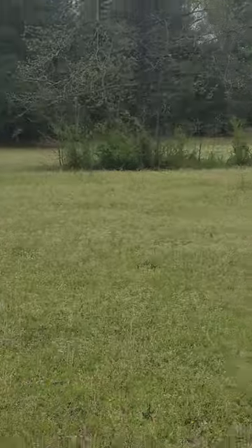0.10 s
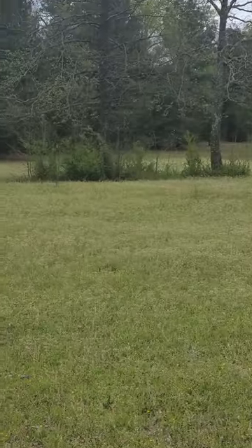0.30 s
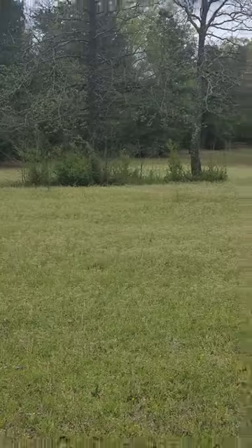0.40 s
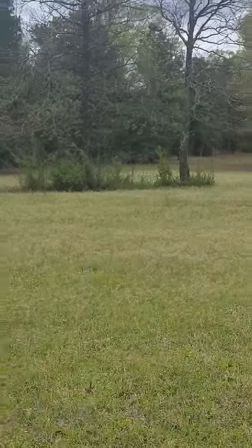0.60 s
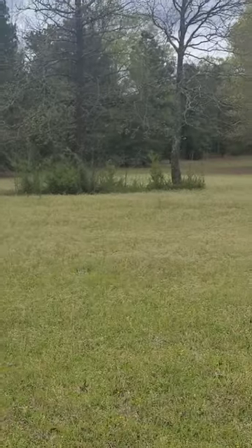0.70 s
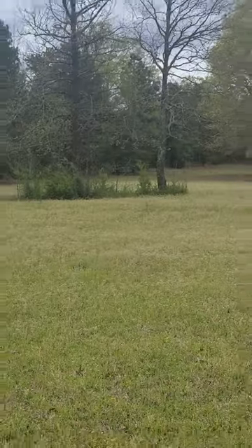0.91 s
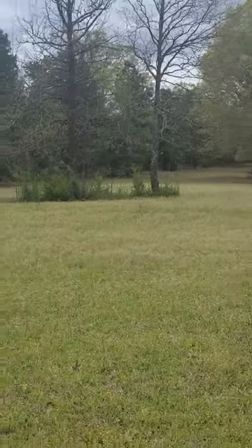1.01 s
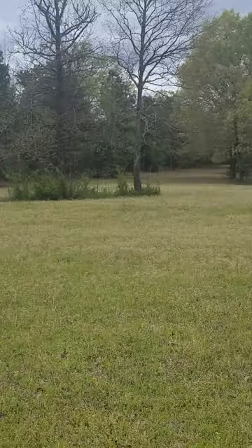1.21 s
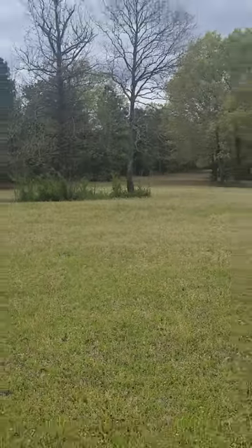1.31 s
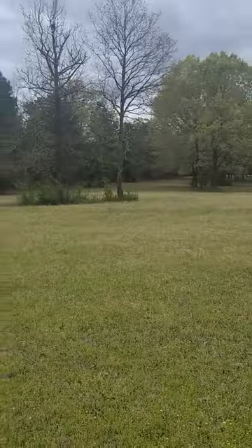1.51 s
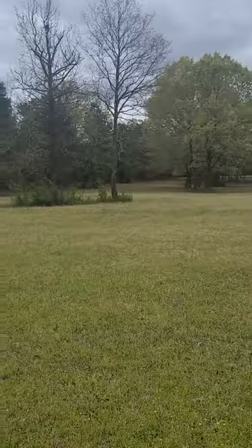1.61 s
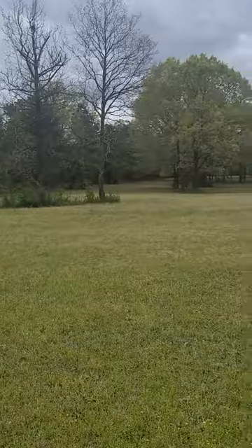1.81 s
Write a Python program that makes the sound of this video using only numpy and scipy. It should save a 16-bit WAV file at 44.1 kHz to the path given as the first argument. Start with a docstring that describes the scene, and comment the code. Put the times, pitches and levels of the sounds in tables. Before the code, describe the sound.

Wind thumps and rumbles on a handheld camera's microphone, strongest near the start, then easing; in a quiet open field a faint cricket trills on the right and a far bird whistles brief gliding notes.

```python
"""Wind buffets in gusts over a soft far hiss and a low drone, while a cricket trills on the right.
A far bird whistles two groups of brief gliding notes, then a thin call drops and flutters; a short rustle
and small ticks sound close by. Wind, hiss, drone and rustle are coloured noise of set left-right likeness;
cricket and birds are gliding sines with scattered echoes; ticks are impulses ringing the shell of
a hand-held camera, whose two ports the wind presses on. Far wind, hiss and cricket sink slowly."""
import sys
import numpy as np
from scipy import signal
from scipy.fft import rfft, irfft, next_fast_len
from scipy.io import wavfile
from scipy.ndimage import map_coordinates

SR = 44100
rng = np.random.default_rng(int(sys.argv[2]) if len(sys.argv) > 2 else 0)


def to_wav(s):
    """Save 16-bit WAV."""
    ch = np.atleast_2d(s).T  # columns
    pcm = np.round(np.clip(ch, -1, 1) * 32767)  # PCM
    wavfile.write(sys.argv[1], SR, pcm.astype(np.int16))


N = 83790
T = np.arange(N) / SR


def amp(db):
    """Decibel law: 20 dB is a factor of ten in amplitude."""
    return 10 ** (np.asarray(db) / 20)


def unit(x):
    """Power normalization: x scaled to rms 1."""
    return x / np.sqrt(np.mean(x ** 2) + 1e-20)


def curves(rows, at=T):
    """Linear interpolation of each column against the first, read along at."""
    s, *cols = np.transpose(rows)
    return [np.interp(at, s, c) for c in cols]


def along(points, hz):
    """Interpolation of (Hz, value) points on a logarithmic frequency axis."""
    f, v = np.transpose(points)
    return np.interp(np.log(hz + 1), np.log(f + 1), v)


def wobble(rate):
    """Slow random modulation: a smooth curve through random knots, rate of them a second."""
    return map_coordinates(rng.standard_normal(400), [T * rate])


def filtered(x, response):
    """Linear filtering: the spectrum of x times a response of frequency."""
    m = next_fast_len(N + SR // 2)
    return irfft(rfft(x, m) * response(np.fft.rfftfreq(m, 1 / SR)), m)[..., :N]


def panned(x, pan_db, lag_s=0):
    """Interaural differences: left is pan_db above right and lag_s after it; the gains average one."""
    if lag_s:
        x = filtered(x, lambda hz: np.exp(np.outer([-1j, 1j], np.pi * hz * lag_s)))
    left = amp(pan_db) / (1 + amp(pan_db))
    return 2 * x * np.array([left + 0 * T, 1 - left + 0 * T])


def rush(gain, alike):
    """Partial coherence: stereo noise of rms 1 from mid and side, with a colour and a likeness."""
    def turn(hz):
        return np.arccos(np.clip(alike(hz), -1, 1)) / 2

    def mid_side_gain(hz):
        return gain(hz) * [np.cos(turn(hz)), np.sin(turn(hz))]

    mid, side = filtered(rng.standard_normal((2, N)), mid_side_gain)
    return unit(np.array([mid + side, mid - side]))


def shape(points):
    """Spectral envelope: the gain of a spectrum table, silent outside it."""
    return lambda hz: amp(along(points, hz)) * (hz > points[0][0]) * (hz < points[-1][0])


def hum_band(centre_hz, width_hz):
    """Band-pass selectivity: a single steep-sided band."""
    return lambda hz: 1 / (1 + ((hz - centre_hz) / width_hz * 2) ** 4)


def echo(x, t60):
    """Diffuse scattering: decaying noise answers x, different in each channel."""
    tail = rng.standard_normal((2, SR // 2)) * amp(-60 * T[:SR // 2] / t60)
    return signal.fftconvolve(x[None], tail / np.linalg.norm(tail[0]), axes=1)[:, :N]


def gate(start, length, edge):
    """Amplitude envelope: linear rise, hold and linear fall within length."""
    return np.clip(np.minimum(T - start, start + length - T) / edge, 0, 1)


def swell(start, rise, hold, fall_db_per_s):
    """Exponential decay: linear rise, hold, then a fade at a constant dB rate."""
    return np.clip((T - start) / rise, 0, 1) * amp(-fall_db_per_s * np.clip(T - start - rise - hold, 0, None))


def peak(f, hz, width):
    """Damped resonance: the response of one band-pass mode."""
    return 1j * f * width / (hz * hz - f * f + 1j * f * width)


def buffet():
    """Turbulent pressure: eddies press on each port; the port facing the gust is louder."""
    # Gusts: start_s, level_db, left_minus_right_db, brightness_db
    gusts = [(0.0, -46.5, 28, -4.5), (0.078, -45.5, 3.5, 6.5), (0.196, -46.5, -5, 11),
             (0.214, -40.5, -16, -14), (0.264, -34, 14, -27), (0.284, -27.5, 5, -6), (0.328, -32.5, 3, -24),
             (0.372, -47, 11, 7), (0.396, -27, -0.5, -2), (0.44, -20.5, -14.5, -4.5),
             (0.46, -31, -12, 12.5), (0.49, -26, 2.5, -19), (0.53, -20.5, -0.5, -8.5), (0.57, -34.5, 6, -5),
             (0.612, -33, 21, -3.5), (0.652, -47.5, 0.5, 6.5), (0.968, -51, 3, 7.5), (1.036, -44.5, 7, -4),
             (1.364, -42.5, 14.5, -0.5), (1.402, -47.5, 7, 3), (1.454, -46.5, 11, 18.5),
             (1.57, -35, 4.5, -25), (1.608, -50, -1, 4), (1.746, -42.5, 11, -5), (1.778, -43, 8.5, 12.5),
             (1.83, -60, 3, -3), (1.878, -43.5, 6, 5), (1.9, -63, 10, -26)]
    # Deep body of a gust: frequency_hz, relative_density_db
    rumble = [(12, -34.5), (20, -5), (40, 2.5), (62, 0), (118, -15), (139, -18), (176, -25.5), (325, -49.5),
              (450, -59), (580, -81), (990, -120)]
    # Bright edge of a gust: frequency_hz, relative_density_db
    flutter = [(59, -36.5), (100, 4), (140, -4), (248, -34), (600, -61.5), (780, -83), (1320, -120)]
    flutter_db, lump_db, ports_alike = -12, 1, 0.66
    level_db, pan_db, bright_db = curves(gusts)

    def alike(hz):
        return ports_alike + 0 * hz

    body = rush(shape(rumble), alike)
    edge = amp(flutter_db + bright_db) * rush(shape(flutter), alike)
    # each port has its own unevenness
    lumps_db = lump_db * np.array([wobble(14.16), wobble(18)])
    return panned(amp(level_db + lumps_db) * (body + edge), pan_db)


def field():
    """Diffuse field: wind in far trees, treble hiss and low humming bands, each filtered noise."""
    # Far levels before the offsets below: start_s, trees_db, hiss_db
    far_levels = [(0.0, -69.5, -75), (0.338, -68.5, -75), (0.57, -69, -76), (0.772, -71, -77.5),
                  (1.386, -75.5, -82.5), (1.9, -74.5, -81)]
    # Colour of wind in trees: frequency_hz, relative_density_db
    tree_colour = [(150, -20), (250, -2.5), (316, -1), (460, -7), (528, -5), (613, -4.5), (698, -4),
                   (2000, -23), (2600, -83), (4400, -120)]
    # Colour of the treble hiss: frequency_hz, relative_density_db
    hiss_colour = [(1500, -20.5), (2200, 0.5), (4200, -2.5), (4800, -4), (6300, -5.5), (6900, -13),
                   (7600, -9.5), (8400, -24), (10300, -23.5), (11200, -19), (11700, -11.5), (15700, -18)]
    # Coherence of the channels: frequency_hz, likeness (1 = identical)
    coherence = [(300, 0.78), (1500, 0.082), (5000, 0.043), (12000, 0.026)]
    # Balance of trees and hiss: frequency_hz, left_minus_right_db
    balance = [(330, -5), (650, 2.5), (1300, -6), (2500, -5.5), (6000, 2), (13000, -6)]
    # Drone bands: centre_hz, width_hz, mean_level_db (before the wander below)
    drone_bands = [(124.5, 37.6, -53), (176.3, 77, -63.5)]
    # A narrower hum that comes and goes: start_s, level_db
    hum_levels = [(0.0, -74), (0.476, -65.5), (0.84, -64), (0.856, -61), (1.412, -82), (1.798, -75.5),
                  (1.9, -75)]
    trees_offset_db, hiss_offset_db = 2, 1.5
    drone_alike, drone_pan_db = 0.9, -3.5
    hum_hz, hum_width_hz = 239.1, 17.3
    trees_db, hiss_db = curves(far_levels)

    def alike(hz):
        return along(coherence, hz)

    def pan(hz):
        return amp(np.outer([.5, -.5], along(balance, hz)))

    trees = filtered(rush(shape(tree_colour), alike), pan)
    trees = amp(trees_db + trees_offset_db + 0.16 * wobble(6.4)) * trees
    hiss = filtered(rush(shape(hiss_colour), alike), pan)
    hiss = amp(hiss_db + hiss_offset_db + 1.9 * wobble(11.67)) * hiss
    drone = amp(curves(hum_levels)[0]) * rush(hum_band(hum_hz, hum_width_hz), alike)
    for hz, width, db in drone_bands:
        # the drone partly follows the level of the trees
        wander_db = 0.38 * (trees_db - trees_db.mean()) + 2.37 * wobble(4.61)
        drone = drone + amp(db + wander_db) * rush(hum_band(hz, width), lambda f: drone_alike + 0 * f)
    return trees + hiss + panned(drone, drone_pan_db)


def cricket():
    """Stridulation: regular wing strokes, each a tone that bends up and down, scattered by the grass."""
    # Trill: start_s, level_db, left_minus_right_db
    trill = [(0, -66, -13), (.17, -66.5, -22), (.5, -67, -17.5), (.75, -68, -20), (.95, -70.5, -29),
             (1.3, -72, -17), (1.5, -72, -35), (1.65, -75.5, -15), (1.9, -76.5, -16)]
    # One wing stroke, before scatter: share_of_cycle, relative_level_db, pitch_hz
    wing_stroke = [(0, -22, 9400), (.06, -7, 9410), (.11, -2, 9440), (.2, 0, 9580), (.3, -.5, 9670),
                   (.38, -1, 9705), (.42, -1, 9650), (.47, -1, 9520), (.51, -6, 9400), (.55, -11, 9250),
                   (.66, -21, 8900), (.72, -40, 8800), (1, -40, 9400)]
    stroke_hz, stroke_start_cycles, lag_s = 62.975, .98, 128e-6
    scatter_db, scatter_hz, waver_db = .8, 26, 1.7
    grass_db, grass_t60_s, grass_tilt_db_per_khz = -6, 0.2, 12.5
    level_db, pan_db = curves(trill)
    cycles = stroke_hz * T + 1 - stroke_start_cycles
    stroke_db, hz = curves(wing_stroke, cycles % 1)
    # one random pitch and level offset for each stroke
    chance = rng.standard_normal((130, 2))[cycles.astype(int)]
    tone = np.sin(2 * np.pi * np.cumsum(hz + scatter_hz * chance[:, 0]) / SR)
    # smooth random level with a knot every 90 samples
    waver = map_coordinates(rng.standard_normal(N // 90 + 4), [np.arange(N) / 90])
    song = amp(stroke_db + scatter_db * chance[:, 1] + waver_db * waver) * tone
    song = unit(song) * amp(level_db)

    def grass_tilt(f):
        # lifts below and dulls above 9.5 kHz, levelling off 1 kHz away
        return amp(-grass_tilt_db_per_khz * np.clip(f / 1000 - 9.5, -1, 1))

    scattered = amp(grass_db) * filtered(echo(song, grass_t60_s), grass_tilt)
    return panned(song, pan_db, lag_s) + panned(scattered, 5.5)


def rustles():
    """Friction noise: a short, streaky brush of cloth or grass, noise through several resonances."""
    # Streaks: centre_hz, width_hz, relative_level_db
    streak_bands = [(1040, 200, 1), (1426, 210, 1), (1800, 100, 2.5), (2180, 250, -1.5), (2480, 260, -0.5),
                    (3400, 640, -12)]
    start_s, rise_s, hold_s, fall_db_per_s = 0.368, 0.011, 0.049, 804
    level_db, grain_db, pan_db = -67, 3.5, -5.5

    def streaks(f):
        power = sum(abs(amp(db) * peak(f, hz, width) ** 2) ** 2 for hz, width, db in streak_bands)
        return np.sqrt(power)

    stroke = swell(start_s, rise_s, hold_s, fall_db_per_s)
    grain = amp(level_db + grain_db * wobble(200))
    return panned(grain * stroke * rush(streaks, lambda f: .5 + 0 * f), pan_db)


def whistler():
    """Frequency modulation: a far bird's gliding pure notes, with a scattered echo."""
    # Notes, level before swell and waver: start_s, length_s, first_hz, last_hz, level_db
    notes = [(0.377, 0.039, 2190, 2400, -75), (0.384, 0.042, 2640, 2730, -67),
             (.455, .025, 2736, 2640, -70), (0.506, 0.0794, 2245, 2190, -64.5),
             (0.736, 0.019, 2334, 2480, -71.5), (0.773, 0.044, 2787, 2820, -71),
             (0.806, 0.07, 2840, 2880, -78.5), (0.855, 0.079, 2148, 2066, -70)]
    edge_s, swell_db, waver_db = 0.0058, 6, 2
    pan_db, lag_s, echo_db = -8, -140e-6, -12
    song = np.zeros(N)
    for start, length, hz0, hz1, db in notes:
        progress = (T - start) / length
        # the glide quickens toward the end of the note
        hz = hz0 + (hz1 - hz0) * np.clip(progress, 0, 1) ** 2
        tone = np.sqrt(2) * np.sin(2 * np.pi * np.cumsum(hz) / SR)
        # the note grows through its first 70 percent
        growth = amp(swell_db * np.clip(progress - .5, -.5, .2))
        song += amp(db) * gate(start, length, edge_s) * growth * tone
    song = song * amp(waver_db * wobble(60))
    return panned(song, pan_db, lag_s) + amp(echo_db) * echo(song, t60=0.5)


def ticks():
    """Impulse response: short clicks that ring their own band and the camera's shell, with a scattered tail."""
    # Clicks: start_s, peak_db (before panning), left_minus_right_db, left_after_right_s, centre_hz,
    # width_hz, shell_db, shell_above_hz, top_hz, tail_db (relative to the click)
    clicks = [(0.5489, -42, -10, 2e-4, 6540, 1500, -1.5, 2490, 20100, -10.5),
              (.6526, -51.5, -29, 2e-4, 4030, 694, -5, 5500, 20100, -8),
              (1.608, -42.5, 6.5, -3e-4, 3180, 2970, 4, 490, 7500, -4),
              (1.6307, -55, -3, 1e-5, 5600, 5030, 6, 497, 7900, 2.5)]
    # Modes of the camera shell: centre_hz, width_hz, relative_level_db
    shell_modes = [(1220, 80, 15), (2300, 500, 2), (3500, 400, 0), (5050, 450, -3), (7250, 450, -2),
                   (10500, 2500, -11), (15000, 2500, -11)]
    tail_t60_s = 0.14
    out = np.zeros((2, N))

    def shell(f):
        # neighbouring modes have opposite sign
        return sum((-1) ** k * amp(db) * peak(f, hz, width) for k, (hz, width, db) in enumerate(shell_modes))

    for s, db, pan_db, lag_s, hz, width, shell_db, low_hz, top_hz, tail_db in clicks:
        push = -1. * (np.arange(N) == round(s * SR))

        def ringing(f):
            own_band = peak(f, hz, width) ** 2
            high_pass = (1j * f / (low_hz + 1j * f)) ** 2
            low_pass = 1 / (1 - (f / top_hz) ** 2 + 1j * f / top_hz) ** 2
            return (own_band + amp(shell_db) * shell(f) * high_pass) * low_pass

        click = filtered(push, ringing)
        click = amp(db) * click / abs(click).max()
        out += panned(click, pan_db, lag_s) + amp(tail_db) * echo(click, tail_t60_s)
    return out


def thin_call():
    """Frequency and amplitude modulation: a high tone drops, then flutters inside a grainy smear."""
    # Call, level before flutter: start_s, pitch_hz, level_db
    call_path = [(.895, 8500, -104), (.91, 8300, -89), (.94, 7870, -87), (.952, 7250, -80),
                 (.973, 7220, -71), (.981, 7200, -81), (.989, 7220, -73), (.999, 7230, -88),
                 (1.008, 7230, -72), (1.028, 7230, -77.5), (1.045, 7300, -87), (1.15, 7300, -88),
                 (1.19, 7150, -100)]
    # Colour of the smear: frequency_hz, relative_density_db
    smear_colour = [(7000, -19), (7300, -14), (7900, -6), (8200, -29)]
    flutter_db, echo_db, pan_db = 2, -9, -19
    smear_start_s, smear_rise_s, smear_hold_s, smear_fall_db_per_s = .925, .04, .115, 140
    smear_db, smear_grain_db = -84, 2.5
    hz, db = curves(call_path)
    sounding = (T > call_path[0][0]) * (T < call_path[-1][0])
    tone = np.sin(2 * np.pi * np.cumsum(hz) / SR)
    call = amp(db + flutter_db * wobble(72.7)) * sounding * tone
    smear = rush(shape(smear_colour), lambda f: 0.29 + 0 * f)
    smear = smear * swell(smear_start_s, smear_rise_s, smear_hold_s, smear_fall_db_per_s)
    smear = smear * amp(smear_db + smear_grain_db * wobble(70.8))
    return panned(call, pan_db) + smear + amp(echo_db) * echo(call, t60=0.53)


def scene():
    """Superposition: the pressures of all sources add."""
    return buffet() + field() + cricket() + rustles() + whistler() + ticks() + thin_call()


def record(dry):
    """Band limiting: nothing sounds from top_hz upward."""
    top_hz = 15750
    return filtered(dry, lambda hz: hz < top_hz)


dry = scene()
out = record(dry)
to_wav(out)
```